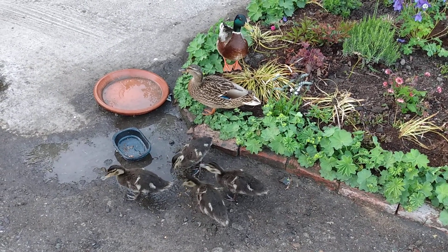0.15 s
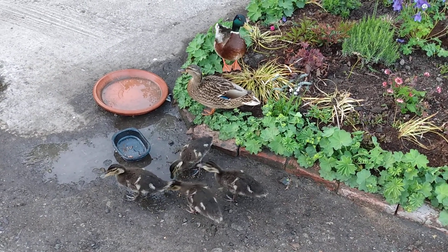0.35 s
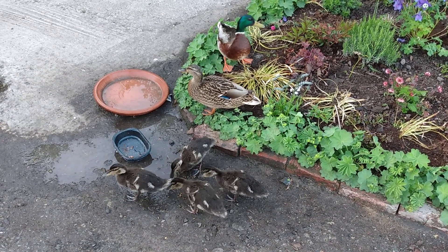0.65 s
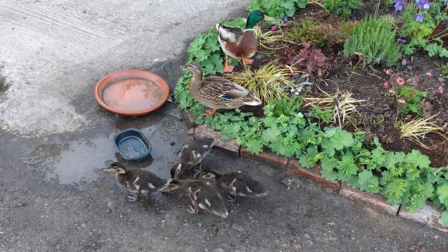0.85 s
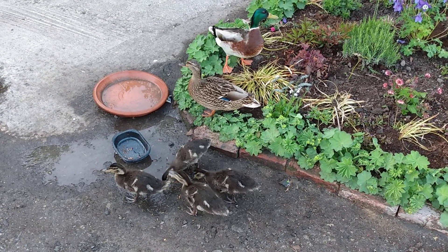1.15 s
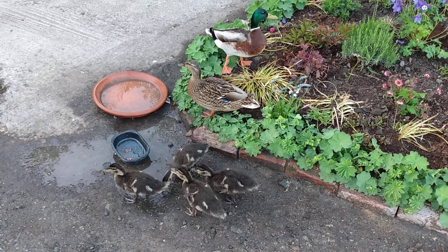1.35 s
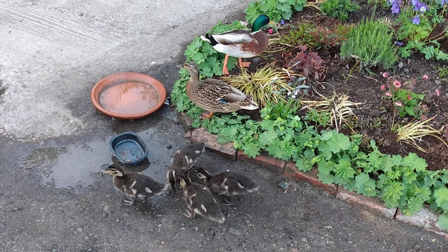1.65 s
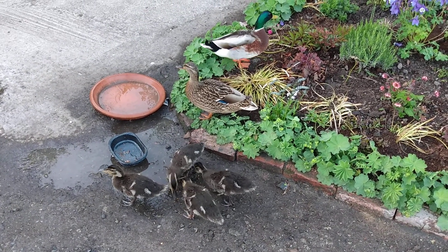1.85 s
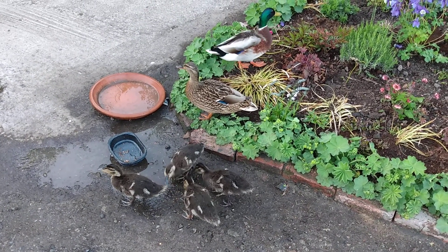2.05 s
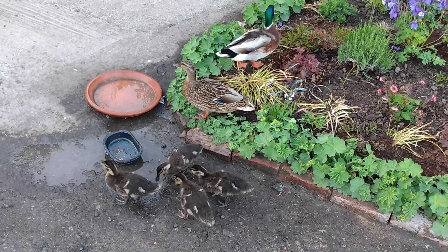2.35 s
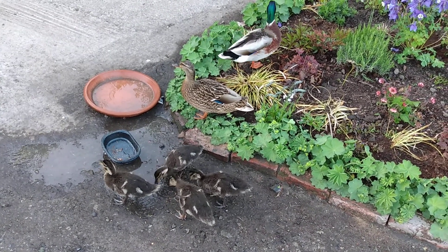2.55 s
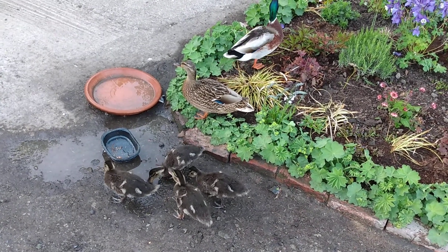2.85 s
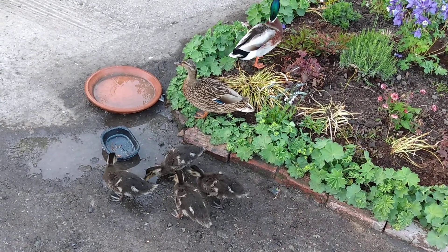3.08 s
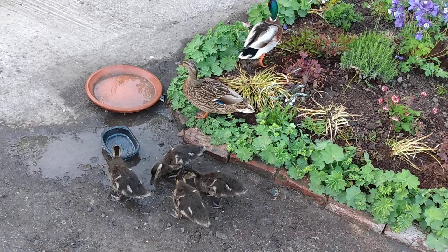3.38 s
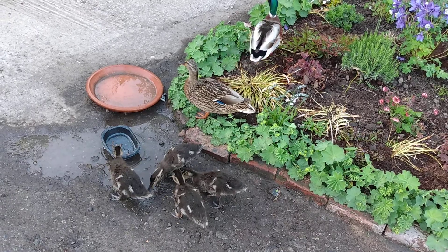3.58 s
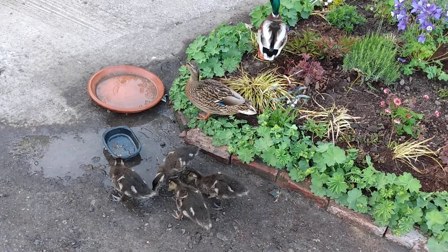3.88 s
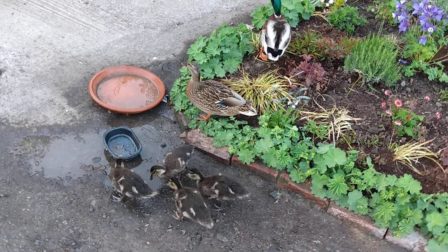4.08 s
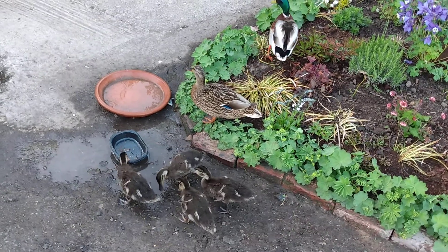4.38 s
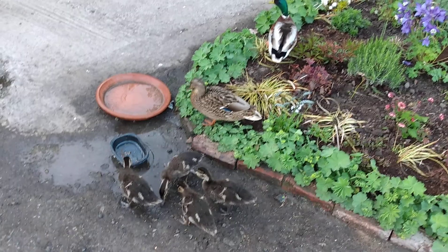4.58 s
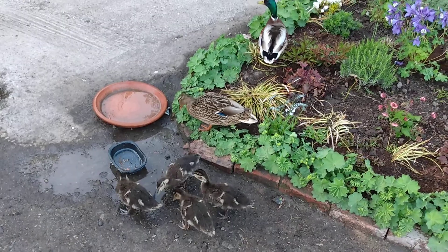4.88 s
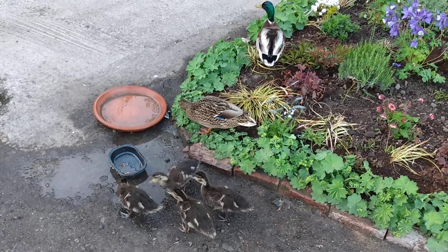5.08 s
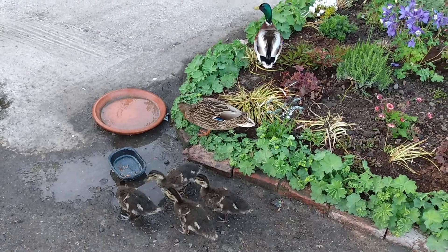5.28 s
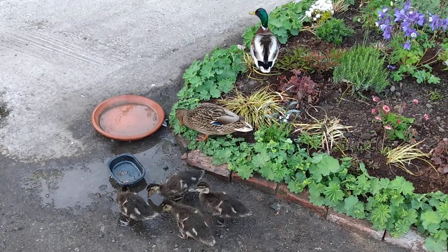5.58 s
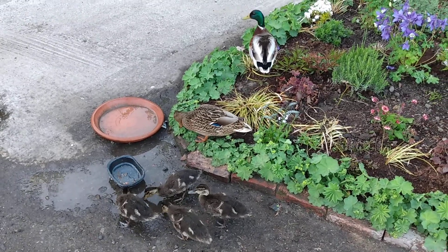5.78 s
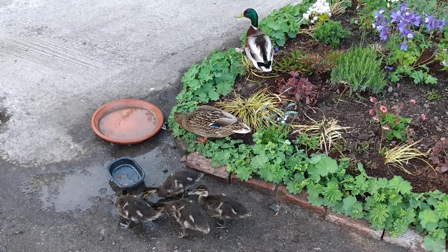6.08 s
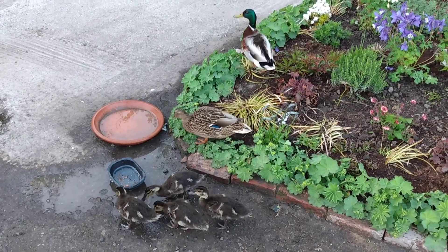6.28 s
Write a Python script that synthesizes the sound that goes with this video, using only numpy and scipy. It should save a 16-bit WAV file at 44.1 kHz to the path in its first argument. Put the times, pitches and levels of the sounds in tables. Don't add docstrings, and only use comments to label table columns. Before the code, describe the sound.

Ducklings peep in thin quick bursts over close, bright crackling hiss, with soft mother-duck grunts, a faint distant bird whistle and late sparrow chirps.

```python
import sys
import numpy as np
from scipy import signal
from scipy.fft import rfft, irfft
from scipy.io import wavfile
from scipy.ndimage import uniform_filter1d, map_coordinates

SR = 44100
rng = np.random.default_rng(int(sys.argv[2]) if len(sys.argv) > 2 else 0)


def voltage_ratio(level):
    return 10 ** (np.asarray(level, float) / 20)


def int16_out(signal):
    q = np.round(np.clip(np.atleast_2d(signal).T, -1, 1) * 32767)
    wavfile.write(sys.argv[1], SR, q.astype(np.int16))


N = 283563
FRAME = 256
TOP_HZ = 15780

# [start t/s, length/s, top f/Hz, level/dB, left minus right/dB]
ARCHED_PEEPS = [(.637, 0.038, 3210, -53, 4), (.74, 0.045, 3620, -53, -13), (1.03, 0.052, 3410, -59, -20),
                (1.435, 0.058, 3040, -53, 15), (.367, 0.021, 3360, -51.5, -14),
                (3.1, 0.045, 2947, -53.5, 15), (3.255, 0.04, 2974, -48, 11), (3.5, 0.045, 3520, -62.5, -2),
                (3.935, 0.055, 3800, -65.5, -14), (1.85, 0.084, 3480, -69, -1.5),
                (4.84, 0.044, 2313, -56, 1), (4.93, 0.052, 2730, -62, 11), (5.005, .04, 3700, -65, -13),
                (5.48, 0.062, 2635, -53, -1.5), (5.59, 0.068, 2673, -48, 3), (6.21, 0.057, 2540, -53, -7)]
# [start t/s, length/s, top f/Hz, level/dB, left minus right/dB]
SHORT_PEEPS = [(.2, 0.029, 2150, -56.5, 1), (.355, 0.027, 2500, -50.5, 1), (.475, 0.039, 2960, -51.5, 20),
               (.89, 0.048, 3170, -60.5, -8), (1.315, 0.024, 2632, -42.5, -4),
               (1.122, 0.021, 3370, -54.5, -14), (2.75, 0.029, 3900, -60.5, 0), (5.028, .02, 2900, -59, 2),
               (1.725, .018, 2620, -53, -1), (2.565, 0.044, 2900, -58, 5), (5.5, 0.02, 2300, -60, -2),
               (4.1, .016, 3100, -59, -2)]
# [start t/s, length/s, start f/Hz, end f/Hz, level/dB]
SWEPT_PEEPS = [(.148, 0.022, 1880, 2480, -58), (.17, 0.03, 2270, 3600, -57.5),
               (.307, 0.028, 3030, 3640, -51), (2.475, 0.045, 2750, 3800, -61),
               (2.515, 0.037, 3830, 3070, -58.5), (4.75, 0.028, 1510, 2580, -74),
               (4.78, 0.039, 3170, 2740, -70), (1.14, 0.026, 3370, 2320, -56),
               (1.305, 0.013, 3320, 2700, -52), (1.485, 0.036, 4100, 1740, -46),
               (1.693, 0.027, 2995, 3810, -57), (1.708, 0.023, 3890, 2450, -51.5),
               (2.037, 0.022, 3180, 3950, -56), (2.063, 0.02, 3800, 2880, -54),
               (3.693, .026, 2990, 3300, -60), (2.32, 0.023, 2780, 3760, -57.5),
               (2.342, 0.034, 3690, 2720, -52), (2.71, 0.026, 3380, 2650, -51),
               (3.34, 0.057, 4130, 2830, -59.5), (4.1, 0.036, 2700, 4050, -62.5),
               (4.133, .017, 4050, 3400, -62), (4.146, 0.024, 3420, 2700, -56),
               (4.985, 0.032, 1990, 2450, -55.5), (4.885, 0.015, 2450, 1940, -58.5),
               (5.04, .03, 2490, 1890, -61), (.352, 0.011, 3600, 3200, -60), (5.68, 0.026, 3490, 2660, -58),
               (4.105, 0.043, 1710, 1975, -63)]
# [start t/s, length/s, level/dB, left minus right/dB, mouth resonance f/Hz]
MOTHER_GRUNTS = [(1.062, 0.069, -54, -5.5, 2020), (1.165, 0.03, -52.5, -7.5, 2250),
                 (1.34, 0.036, -52, -6, 2030), (2.08, 0.024, -58.5, -3, 1620), (2.326, 0.051, -54, 2, 1830),
                 (2.719, 0.042, -58, -4, 1580), (3.004, 0.053, -55, 3, 2060),
                 (3.585, 0.061, -64.5, -6.5, 1400), (3.835, 0.068, -69, 5, 1430),
                 (4.506, 0.16, -71, -6, 1650), (4.747, 0.059, -62.5, 3.5, 1850),
                 (4.995, 0.067, -56, 3, 2470)]
# [t/s, level/dB, left minus right/dB]
RUSTLE = [(0, -46.5, 2.5), (.25, -40.5, 0), (.75, -39.5, 0), (.97, -49, 2.5), (1.06, -43.5, 4.5),
          (1.38, -39, 2), (1.75, -49.5, 3.5), (2.04, -47.5, 1.5), (2.38, -48, 2.5), (2.5, -43, 4.5),
          (2.72, -43.5, 3), (3.11, -47.5, 4), (3.5, -46.5, 4), (3.7, -46.5, 4.5), (4.55, -52.5, -1.5),
          (4.91, -51.5, 2), (5.43, -47, 4), (6.43, -46.5, 0)]
# [t/s, level/dB]
GUSTS = [(0, -71), (.11, -74.5), (.15, -62), (.41, -58), (1.05, -67.5), (1.34, -62.5), (1.99, -77.5),
         (2.29, -73), (2.7, -65), (3.17, -74.5), (3.53, -63), (3.76, -72), (4.67, -82.5), (4.93, -72.5),
         (5.37, -78), (5.6, -63.5), (5.89, -65.5), (6.43, -57.5)]
# [f/Hz, level/dB]
GUST_COLOUR = [(800, -32.5), (1050, -6.5), (1500, -6), (2000, 3.5), (2600, -2)]
# [t/s, half-width/s, level/dB]
LULLS = [
    (.97, .02, 1.5),
    (1.78, 0.019, -2),
    (3.2, 0.031, -4),
    (3.885, 0.01, -5),
    (4.33, 0.037, -4),
    (4.565, 0.024, -5),
    (4.74, 0.026, -2),
    (4.82, .015, -4),
    (4.955, 0.032, -5),
    (5.085, 0.011, -2),
]
# [t/s, half-width/s, level/dB]
TWIGS = [
    (1.99, 0.037, -4),
    (3.0, .07, -10),
    (3.17, .06, -14),
    (3.68, 0.063, 5),
    (4.08, .15, 8),
    (5.87, 0.067, -10),
]
# [t/s, level from 8.3 to 11.5 kHz/dB, level above/dB]
SHARING = [(0, -1.5, -2.5), (1.55, -2, -1.5), (1.7, 4, 2.5), (2.3, 4, 1), (2.5, 2, -2), (3.7, 1.5, -.5),
           (4.2, 6, 3.5), (4.7, 6, 6), (4.9, 2.5, 2.5), (5.7, 2.5, -1.5), (6.43, 4, 1)]
# [t/s, peak level/dB, f/Hz]
SNAPS = [(0.0583, -21, 11900), (0.179, -24, 8800), (.3184, -20, 11400), (.408, -22, 7060),
         (0.4231, -14.5, 8600), (0.7149, -15, 9000), (.729, -15.5, 8800), (.905, -25, 11800),
         (1.0246, -20, 9150), (1.155, -29, 9700), (1.283, -20, 8500), (1.3776, -19, 9600),
         (1.497, -19, 9500), (1.5338, -21.5, 7700), (1.992, -23, 11200), (2.6028, -24.5, 11200),
         (2.7108, -18, 11100), (2.7335, -23.5, 9800), (2.9368, -21.5, 11000), (3.2985, -22.5, 11800),
         (3.4077, -20.5, 10900), (3.4418, -21, 10900), (4.586, -31, 8060), (4.7638, -27.5, 9200),
         (4.9815, -26.5, 10600), (5.101, -26.5, 10400), (5.259, -24.5, 10300), (5.443, -23.5, 8700),
         (5.5667, -23.5, 8850), (5.7013, -18.5, 9100)]
# [t/s, peak level/dB, f/Hz]
TICKS = [(0.0202, -25, 13100), (0.108, -28, 9270), (0.3486, -30, 11500), (0.5033, -23, 11400),
         (0.6203, -21, 13100), (0.6465, -19.5, 13100), (0.8445, -30, 9320), (0.9496, -20.5, 13400),
         (1.3508, -34, 9250), (1.5636, -26, 9540), (1.604, -28, 7020), (1.6452, -29, 13300),
         (1.7202, -28, 11600), (1.861, -32, 8500), (1.9614, -36, 11400), (2.0692, -26, 10600),
         (2.161, -30, 12100), (2.4214, -40, 10500), (2.6524, -27, 9660), (2.771, -31, 10000),
         (2.829, -34, 13800), (3.0589, -31, 8750), (3.1558, -31.5, 7960), (3.2025, -32, 9080),
         (3.3303, -25, 9800), (3.492, -28.5, 8300), (3.5902, -29, 8060), (3.6077, -29, 10500),
         (3.6356, -29, 9900), (3.6575, -26.5, 9760), (3.7926, -35, 12000), (3.922, -31, 9400),
         (3.9438, -30, 7850), (3.9794, -26, 8000), (4.157, -32.5, 9700), (4.268, -32, 9700),
         (4.3587, -38, 9460), (4.3776, -30, 11500), (4.4094, -39, 10800), (4.8668, -33, 8300),
         (5.1507, -41, 10700), (5.2909, -26.5, 8200), (5.3428, -33, 13100), (5.366, -28, 8470),
         (5.3997, -33, 9800), (5.4237, -39, 8200), (5.5006, -29, 8470), (5.657, -24, 13500),
         (5.7225, -29, 9800), (5.767, -27, 10800), (5.912, -31, 11600), (5.98, -27, 8400),
         (5.996, -29, 8700), (6.053, -26, 8900), (6.098, -27, 9250), (6.128, -25, 8700)]
# [t/s, peak level/dB, f/Hz]
MORE_SNAPS = [(1.078, -20, 10600), (1.1672, -22, 11000), (1.2606, -17.5, 8800), (1.4017, -19, 10500),
              (1.4592, -18, 11000), (1.5711, -21, 8950), (2.4811, -22.5, 11000), (2.5422, -23, 10000),
              (2.5631, -27, 10500), (2.6165, -25, 9000), (2.6265, -26, 8800), (2.6418, -25, 12000),
              (2.7165, -22, 10400), (2.784, -26, 10000), (3.272, -28.5, 10500), (3.6835, -24, 10500),
              (4.8998, -33, 10000), (4.9903, -29, 10000)]
# [f/Hz, level/dB]
LEFT_PORT = [(4000, -12.5), (5100, -10.5), (6000, -2.5), (8500, 2.5), (10000, 2.5), (12000, -1),
             (14000, -1), (16000, 1)]
# [f/Hz, level/dB]
RIGHT_PORT = [(4000, -16.5), (5500, -8.5), (6500, -3), (7700, -6.5), (9200, -5), (10500, -3.5),
              (11600, -0.5), (16000, -7)]
# [t/s, f/Hz, height/dB]
BEARING = [(0, 13300, 6.5), (1.85, 13200, 6.5), (2.0, 11800, 5.5), (3.6, 12800, 1.5), (4.8, 13100, -0.5),
           (4.95, 14100, 7.5), (6.43, 14300, 2.5)]
# [t/s, left 7 kHz level/dB, left top level/dB, right low resonance f/Hz, its height/dB]
HAND_SHADE = [(0, -5, 5, 9700, 8), (.85, -3, -0.5, 10000, 3), (1., -3.5, 2.5, 10200, 10),
              (1.6, -2, 2, 10200, 4), (1.85, -7.5, -3.5, 8100, 4.5), (2.7, -8.5, 3.5, 7900, 6.5),
              (3.1, -10, -2, 8200, 5), (3.3, -7.5, 2, 8100, 11.5), (3.8, -8, -1, 8100, 9),
              (4.0, -4, -1, 7600, 9), (4.15, -6, -2, 7900, -1), (4.45, -5.5, -3, 7970, 1),
              (4.55, -1.5, -8, 7760, 3), (5.1, -5, 0, 8200, 6), (5.7, -4, 0.5, 8000, 3),
              (6.43, 0.5, -1, 8100, 2)]
# [t/s, lag/ms]
PORT_LAG = [(0, .53), (1.9, .53), (1.95, .653), (4.85, .653), (4.9, .54), (6.43, .538)]
# [t/s, level/dB, f/Hz, left minus
# right/dB, 60 dB decay/s]
TAPS = [(.205, -69, 460, -6, 0.056), (.375, -74, 670, -14, 0.072), (2.73, -74, 529, -16, 0.11),
        (5.03, -72, 204, -11, 0.13), (5.648, -60.5, 706, 3, 0.065), (1.105, -57, 2100, -5, 0.0071),
        (1.18, -59, 2200, -5, .006), (1.284, -59, 2000, -5, 0.0072), (1.346, -57, 2000, -5, .007),
        (5.591, -48, 2550, -2, 0.0089), (5.69, -70, 715, 4, 0.064), (5.745, -67.5, 730, 4, 0.046),
        (5.935, -72, 780, -12, 0.06)]
# [start t/s, length/s, start f/Hz, end f/Hz, level/dB]
WHISTLES = [(2.6, 0.21, 1700, 1870, -61), (2.905, 0.06, 2250, 1755, -61), (2.955, 0.057, 1800, 1920, -66),
            (3.2, 0.095, 1585, 1700, -74), (2.21, 0.093, 3400, 3420, -73), (3.02, 0.072, 2150, 2218, -61.5),
            (3.6, 0.1, 2044, 1790, -61.5), (3.67, 0.071, 1815, 2125, -58.5),
            (3.74, 0.11, 2084, 2172, -50.5), (3.905, 0.084, 2390, 2490, -56),
            (3.98, 0.12, 2494, 2554, -64.5), (4.032, 0.1, 2190, 2150, -53),
            (4.22, 0.067, 2140, 2160, -70.5), (4.3, 0.33, 4147, 4490, -73), (4.82, 0.24, 4580, 4750, -67.5)]
# [delay t/s, length/s, start f/Hz, end f/Hz, level/dB]
CHEEP = [
    (0, 0.0098, 4770, 4020, -1.5),
    (0.01, 0.017, 4020, 3540, -1.5),
    (0.021, .01, 3790, 4730, -1),
    (0.046, .016, 5140, 4650, 0.5),
]
# [delay t/s, length/s, start f/Hz, end f/Hz, level/dB]
CHIRRUP = [
    (-.018, .018, 5700, 4800, -15),
    (.002, .008, 4550, 3900, 3),
    (.008, .008, 3900, 2750, -4),
    (.015, .007, 2800, 3400, -3),
    (.02, .015, 3460, 3560, 3),
    (.042, .04, 3580, 3480, -9),
    (.05, .038, 4250, 4050, -5),
    (.08, .042, 3550, 2520, -1),
]
# [t/s, level/dB, pace]
CHEEPS = [
    (5.378, -58, 1),
    (5.527, -53.5, 0.92),
    (5.673, -50, 1.01),
]
# [t/s, level/dB, pace]
CHIRRUPS = [
    (6.047, -47.5, .99),
    (6.257, -46, 1.01),
]
# [f/Hz, density/dB per Hz]
AIR_COLOUR = [(15, -23), (25, 0), (113, -13), (134, -14.5), (314, -15.5), (421, -18.5), (523, -19),
              (1000, -21), (1300, -49), (2200, -120)]
# [f/Hz, density/dB per Hz]
GATE_FLOOR = [(780, -140), (900, -89.5), (1200, -95.5), (2000, -101), (3500, -97.5), (5000, -92.5),
              (6000, -104), (7000, -130)]


def ducklings():
    rising_pan_db, falling_pan_db = -12, -2.5
    rows = np.vstack([
        humps(ARCHED_PEEPS, rise_hz=277, fall_hz=285, hz_per_s=5580),
        humps(SHORT_PEEPS, rise_hz=90, fall_hz=161, hz_per_s=0),
        glides(SWEPT_PEEPS, .64, rising_pan_db, .51, falling_pan_db),
    ])
    return syrinx(rows, 0.45, 4.3, waver=.009, breath=.45)


def humps(table, rise_hz, fall_hz, hz_per_s):
    s, length, top, db, pan_db = np.transpose(table)
    depth = hz_per_s * length
    return np.array([s, length, top - rise_hz - depth, top, top - fall_hz - depth, db, pan_db]).T


def glides(table, up_reach, up_pan_db, down_reach, down_pan_db):
    s, length, f0, f2, db = np.transpose(table)
    rising = f2 > f0
    middle = f0 + np.where(rising, up_reach, down_reach) * (f2 - f0)
    return np.array([s, length, f0, middle, f2, db, np.where(rising, up_pan_db, down_pan_db)]).T


def syrinx(rows, edge, flutter_db, buzz_hz=0., buzz=0., waver=0., breath=0.):
    out, wobble = np.zeros((2, N)), walk(120)[0]
    husk = 1 + breath * walk(500)[0]
    for s, length, f0, f1, f2, db, pan_db in rows:
        i, u = int(s * SR), np.linspace(0, 1, int(length * SR))
        span = slice(i, i + len(u))
        hz = f0 * (1 - u) * (1 - 2 * u) + 4 * f1 * u * (1 - u) + f2 * u * (2 * u - 1)
        hz = hz * (1 + waver * wobble[::-1][span])
        swell = np.sin(np.pi * u) ** edge * voltage_ratio(flutter_db * wobble[span])
        throb = np.cos(2 * np.pi * buzz_hz * length * u + wobble[span])
        swell = swell * (1 + buzz * (length > .032) * throb)
        tone = np.sin(2 * np.pi * np.cumsum(hz) / SR)
        tone = np.sqrt(2) * voltage_ratio(db) * husk[span] * swell * tone
        out[:, span] += tone * sides(pan_db) / np.sqrt(np.mean(sides(pan_db) ** 2))
    return out


def mother_duck(rough, throb_hz, mouth_width_hz):
    out, shake, order = np.zeros((2, N)), walk(400)[0], np.arange(2, 8)[:, None]
    hz = 514
    for s, length, db, pan_db, mouth_hz in MOTHER_GRUNTS:
        i, u = int(s * SR), np.linspace(0, 1, int(length * SR))
        span = slice(i, i + len(u))
        phase = 2 * np.pi * np.cumsum(hz * (1 + rough * shake[span])) / SR
        weight = 1 / (1 + ((order * hz - mouth_hz) / mouth_width_hz) ** 2) + 0.025 * (order == 2)
        voice = np.sum(weight * np.sin(order * phase), axis=0)
        voice = voice * (1 + 0.77 * np.sin(2 * np.pi * throb_hz * length * u))
        swell = np.sqrt(np.sin(np.pi * u) + 1e-9)
        out[:, span] += voltage_ratio(db) * voice / np.std(voice) * swell * sides(pan_db)
    return out


def leaves():
    shared = crackle(1200, 7, 0.73, -16, -5.0, 1.73)
    own = [crackle(1400, 6.7, 0.4, -10.0, -4.5, 1.9), crackle(1500, 6, 0.34, -6.0, -1.0, 1.2)]
    hz, s, ticks = frames(np.array([shared, late(shared)]), size=FRAME)
    middle_db, high_db = column(SHARING, s)
    own_gain = voltage_ratio(np.where(hz < 8300, -5, np.where(hz < 11500, middle_db, high_db) - 1))
    ticks = ticks + own_gain * frames(np.array(own), size=FRAME)[2]
    ticks = ticks * 1.104 / np.sqrt(1 + own_gain ** 2)
    ticks[1] *= np.exp(1j * np.pi / (1 + np.exp((hz - 8300) / 250)))
    breath = voltage_ratio(3.4 * walk(40, count=2)) * rng.standard_normal((2, N))
    breath = frames(breath, size=FRAME)[2]

    treble_db, pan_db = column(RUSTLE, s)
    treble_db = treble_db + sum(db * bump(s, at, width) for at, width, db in LULLS)
    top = voltage_ratio(treble_db + 4.0 + leaf_ports(hz, s, pan_db)) * (hz > 3800)

    gust_db = column(GUSTS, s)[0]
    gust_pan_db = np.minimum(-8 + 0.7 * (gust_db + 63) + 1.32 * s, 0)
    twig_db = gust_db + 11.5 + sum(db * bump(s, at, width) for at, width, db in TWIGS)
    body_db = np.where(hz < 2650, gust_db + 14 + colour(GUST_COLOUR, hz), twig_db)
    body = voltage_ratio(body_db + sides_db(gust_pan_db)) * (hz < 5000)
    return unframe(ticks * top + (breath + 0.5 * ticks) * body)


def leaf_ports(hz, s, pan_db):
    dip_db, edge_db, low_hz, low_db = column(HAND_SHADE, s)
    hump_hz, hump_db = column(BEARING, s)
    left = colour(LEFT_PORT, hz) + dip_db * bump(hz, 7150, 800) + edge_db * bump(hz, 15300, 1600)
    right = colour(RIGHT_PORT, hz) + hump_db * bump(hz, hump_hz, 1500) + low_db * bump(hz, low_hz, 900)
    turns_db = patches(hz, s, 60, 2500, 1.8) + patches(hz, s, 5, 1500, 1.0)
    return np.array([left + pan_db / 2, right - pan_db / 2]) + turns_db


def crackle(rate, spread_db, smear_ms, smear_db, hiss_db, burst_db):
    hit = rng.random(N) < rate / SR * voltage_ratio(4 * walk(60)[0])
    size = np.minimum(rng.exponential(size=N), 2.4)
    ticks = hit * voltage_ratio(spread_db * size)
    tails = np.sqrt(signal.lfilter([1], [1, -np.exp(-1000 / (smear_ms * SR))], ticks ** 2))
    ticks = ticks * np.sign(rng.standard_normal(N))
    ticks = ticks + voltage_ratio(smear_db) * tails * rng.standard_normal(N)
    x = ticks / np.std(ticks) + voltage_ratio(hiss_db) * rng.standard_normal(N)
    x = x * voltage_ratio(0.48 * burst_db * walk(55)[0] + 1.08 * burst_db * walk(170)[0])
    return x / np.std(x)


def patches(hz, s, rate, width_hz, depth_db):
    centre = np.arange(4000, 17000, width_hz)[:, None, None]
    at = np.minimum(s * SR, N - 1).astype(int)
    flicker = walk(rate, count=len(centre))[:, at][:, None, :]
    return depth_db * np.sum(flicker * np.clip(1 - np.abs(hz - centre) / width_hz, 0, 1), axis=0)


def late(x):
    lag_ms = column(PORT_LAG, np.arange(N) / SR)[0]
    return map_coordinates(x, [np.arange(N) - lag_ms * SR / 1000], order=3, mode="nearest")


def snaps(table, tick_db, tail_db, tail_t60):
    s, db, hz = np.transpose(table)
    pan_db = column(RUSTLE, s)[1]
    splinter = uniform_filter1d(rng.standard_normal(N), size=4) * 2
    cracks = rings(s, db + tick_db, hz, pan_db, 0.0013)
    cracks = cracks + splinter * rings(s + .0006, db + tail_db, hz, pan_db, tail_t60)
    cracks = signal.sosfilt(signal.butter(3, 5600, "high", fs=SR, output="sos"), cracks)
    return np.array([cracks[0], voltage_ratio(-5) * late(cracks[1])])


def taps():
    return rings(*np.transpose(TAPS))


def rings(s, db, hz, pan_db, t60):
    out = np.zeros((2, N + SR))
    for at, d, f, p, tail in np.broadcast(s, db, hz, pan_db, t60):
        t = np.arange(int(tail * SR)) / SR
        ring = np.sin(2 * np.pi * f * t) * np.exp(-np.log(1000) * t / tail)
        out[:, int(at * SR):int(at * SR) + len(t)] += voltage_ratio(d) * ring * sides(p)
    return out[:, :N]


def sparrow():
    rows = calls(CHEEPS, CHEEP) + calls(CHIRRUPS, CHIRRUP)
    return syrinx(rows, .5, 2.0, buzz_hz=230., buzz=1.1, waver=.004, breath=.25)


def calls(table, syllables):
    rows = []
    for s, db, pace in table:
        for delay, length, f0, f2, own_db in syllables:
            pan_db = -11.5 + 3 * (delay > .012)
            rows.append((s + pace * delay, length, f0, (f0 + f2) / 2, f2, db + own_db, pan_db))
    return rows


def songbird():
    reach, pan_db = 0.71, -2.5
    rows = glides(WHISTLES, reach, pan_db, reach, pan_db)
    return syrinx(rows, 0.44, 3., waver=.007, breath=.5)


def yard(x, t60, wet_db, ground_ms, ground_db, lag_ms):
    t = np.arange(int(.4 * SR)) / SR
    tail = rng.standard_normal((2, len(t))) * np.exp(-np.log(1000) * t / t60) * (t > .004)
    tail *= voltage_ratio(wet_db) / np.sqrt(np.sum(tail ** 2, axis=1, keepdims=True))
    tail[[0, 1], [0, int(lag_ms * SR / 1000)]] = 1
    for port, ms in enumerate(ground_ms):
        tail[port, int(ms * SR / 1000)] += voltage_ratio(ground_db)
    return signal.fftconvolve(x, tail, axes=1)[:, :N]


def air():
    mid, side = rng.standard_normal((2, N))
    hz = np.fft.rfftfreq(N, 1 / SR)
    pair = np.array([mid + 0.32 * side, mid - 0.59 * side])
    low = irfft(rfft(pair) * voltage_ratio(colour(AIR_COLOUR, hz)) * (hz < 900) * (hz > 34), N)
    low = low / np.std(low) * voltage_ratio(-85.5 + 1.0 * walk(2.96))
    hiss = irfft(rfft(rng.standard_normal((2, N))) * (hz >= 900), N)
    return low + voltage_ratio(-75.0) * hiss


def column(table, s):
    t, *rest = np.transpose(table)
    return [np.interp(s, t, c) for c in rest]


def colour(points, hz):
    f, db = np.transpose(points)
    return np.interp(np.log(hz + 1), np.log(f), db)


def bump(x, centre, width):
    return np.exp(-((x - centre) / width) ** 2)


def walk(rate, count=1):
    k = int(SR / rate)
    held = np.repeat(rng.standard_normal((count, N // k + 1)), k, axis=1)
    return 0.91 * uniform_filter1d(uniform_filter1d(held, k), k)[:, :N]


def sides(pan_db):
    return voltage_ratio(np.array([[.5], [-.5]]) * pan_db)


def sides_db(pan_db):
    return np.array([pan_db / 2, -pan_db / 2])[:, None, :]


def frames(x, size):
    hz, s, z = signal.stft(x, SR, nperseg=size, noverlap=size * 3 // 4)
    return hz[:, None], s, z


def unframe(z):
    size = 2 * z.shape[-2] - 2
    return signal.istft(z, SR, nperseg=size, noverlap=size * 3 // 4)[1][..., :N]


def gate(x):
    hz, s, z = frames(x, size=2 * FRAME)
    power = uniform_filter1d(np.abs(z) ** 2, size=16, axis=2)
    power = uniform_filter1d(power, size=2, axis=1) * FRAME / SR * 8 / 3 + 1e-18
    both, left, right = rng.standard_normal((3, len(hz) // 2 + 1, len(s) // 40 + 1))
    guess = 0.77 * both + 0.77 * np.array([left, right])
    guess = guess.repeat(40, axis=2).repeat(2, axis=1)[:, :len(hz), :len(s)]
    shut = voltage_ratio(colour(GATE_FLOOR, hz) + 6.1 * uniform_filter1d(guess, size=20, axis=2)) ** 2
    gain = np.sqrt(np.clip(1 - (shut / power) ** 4.1, .001, 1))
    return unframe(z * uniform_filter1d(gain, size=4, axis=2))


def mask(x, depth_db, mood_db):
    hz, s, z = frames(x, size=4 * FRAME)
    power = np.sum(np.abs(z) ** 2, axis=0, keepdims=True)
    power = uniform_filter1d(uniform_filter1d(power, size=7, axis=2), size=4, axis=1)
    around = uniform_filter1d(power, size=31, axis=1, origin=8)
    around = around + .5 * uniform_filter1d(power, size=15, axis=1)
    mood = rng.standard_normal((1, len(hz) // 5 + 1, len(s) // 10 + 1))
    mood = mood.repeat(5, axis=1).repeat(10, axis=2)[:, :len(hz), :len(s)]
    limit = around * voltage_ratio(depth_db + mood_db * mood) ** 2
    keep = (power > limit)[:, 2::4, 2::4].repeat(4, axis=1).repeat(4, axis=2)
    keep = np.pad(keep, ((0, 0), (0, 4), (0, 4)), "edge")[:, :len(hz), :len(s)]
    return unframe(z * (keep | (hz < 850) | (hz > 7500)) * (hz < TOP_HZ))


def scene():
    ducks = yard(ducklings() + mother_duck(0.075, 75, 480), 0.26, -9.0, (.9, 1.3), -11, 0.32)
    far_bird = yard(songbird(), 0.54, -6.0, (1.1, 1.6), -14, .1)
    near_bird = yard(sparrow(), 0.16, -6, (.8, 1.2), -22, 0.22)
    cracks = snaps(SNAPS, 3.6, -9, 0.012) + snaps(TICKS, 2.6, -9.5, 0.016) + snaps(MORE_SNAPS, 2.6, -11.5, .009)
    return ducks + far_bird + near_bird + leaves() + cracks + taps()


def low_pass(x):
    return signal.sosfilt(signal.butter(12, 17080, fs=SR, output="sos"), x)


def record(dry):
    mix = mask(gate(dry) + air(), depth_db=-11, mood_db=3.5)
    mix = signal.sosfilt(signal.ellip(10, .2, 70, TOP_HZ, fs=SR, output="sos"), mix)
    return low_pass(mix)


dry = scene()
out = record(dry)
int16_out(out)
```